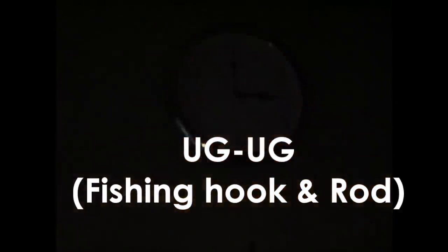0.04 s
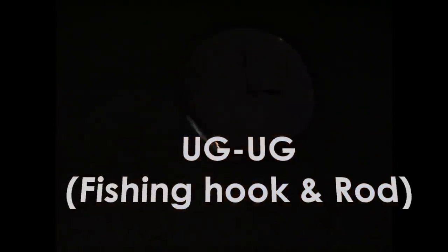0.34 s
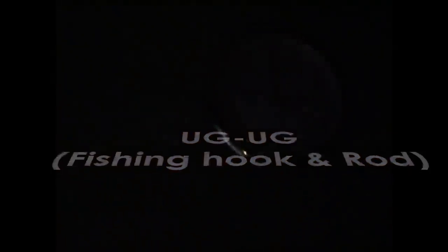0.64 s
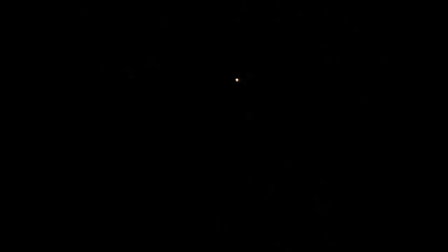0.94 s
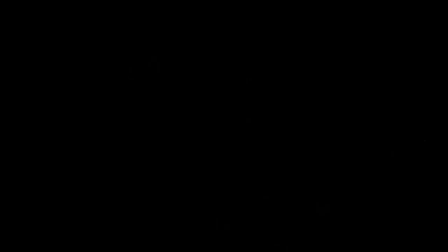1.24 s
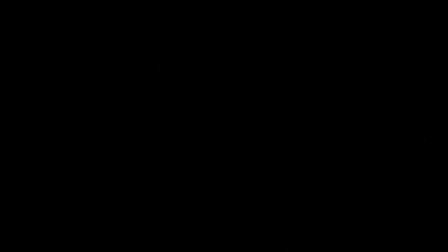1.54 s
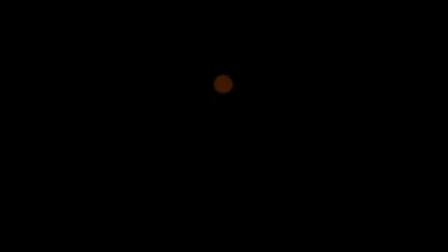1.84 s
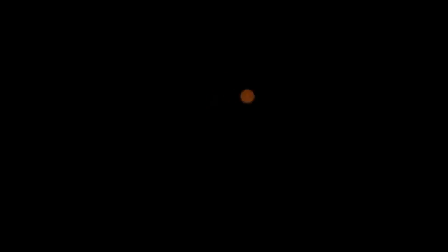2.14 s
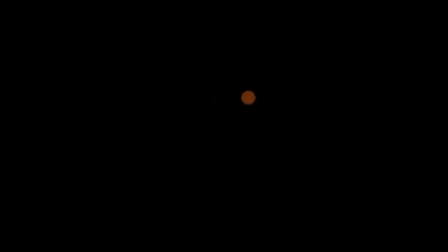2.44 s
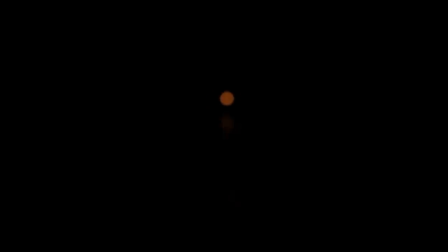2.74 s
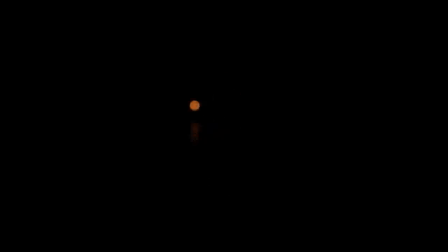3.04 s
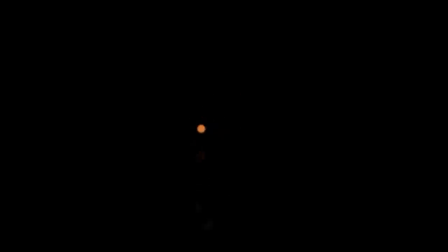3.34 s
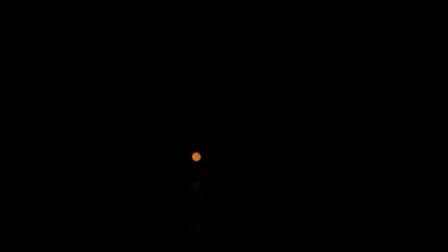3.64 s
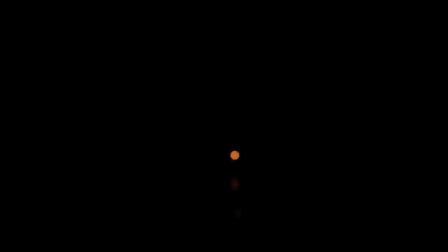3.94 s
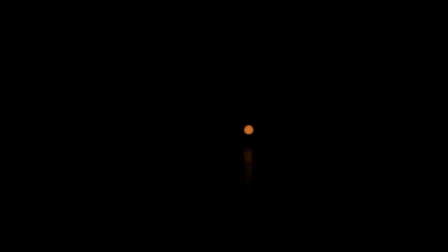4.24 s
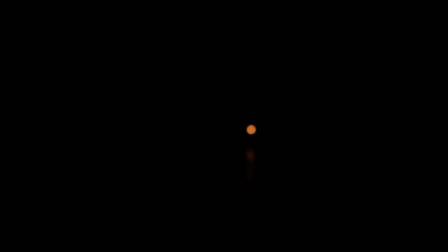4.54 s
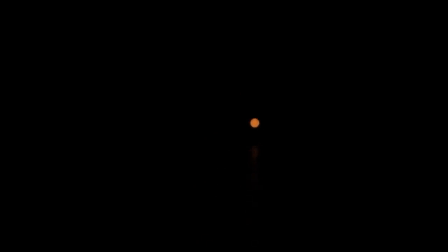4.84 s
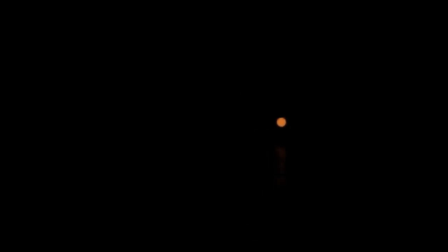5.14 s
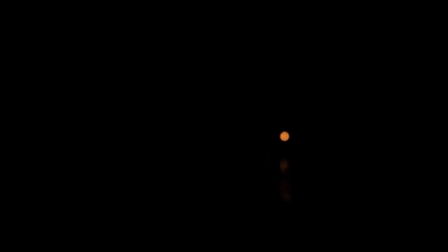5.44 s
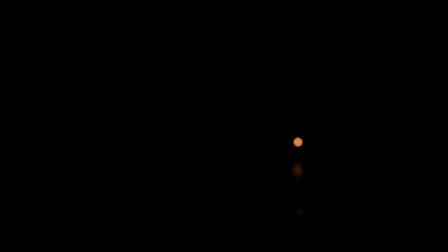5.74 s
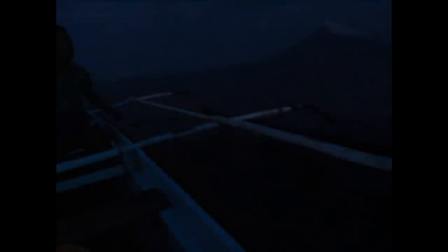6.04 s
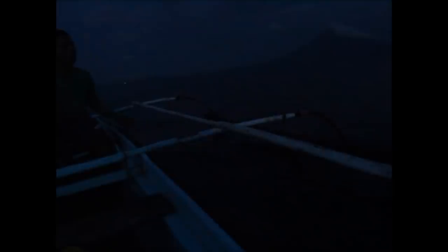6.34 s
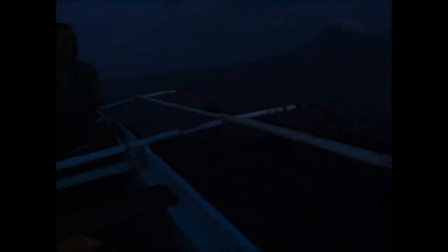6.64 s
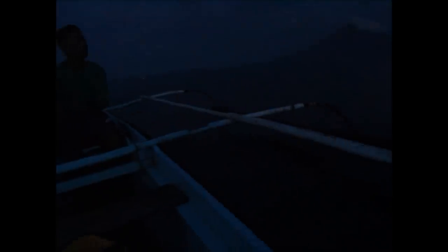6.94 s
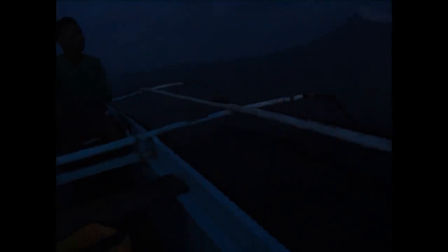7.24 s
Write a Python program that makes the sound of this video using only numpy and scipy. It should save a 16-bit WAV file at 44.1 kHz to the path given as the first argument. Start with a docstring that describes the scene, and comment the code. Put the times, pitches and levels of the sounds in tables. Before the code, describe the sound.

Heard from aboard a small boat at sea at night, a one-cylinder engine putters rapidly and steadily, with metallic clatter, small dry ticks and a low rumble of water. It is preceded by a short, faint moment of hum and high insect chirps. For the last second and a half it jumps abruptly to a louder, slightly slower pounding. Each change is a sharp cut with a click, and the bass sits mostly on the right.

```python
"""On the water at night, in three moments: a quiet hum with shrill insect chirps, a small outrigger
boat under way, then the same boat louder. Its single-cylinder engine is a periodic impulse source,
firing about 12-14 times a second: a combustion knock, then a hiss of gas and a thump that glides
up in pitch. The hull reflects each thump and resonates with it, loose metal clacks and water surges.
The right microphone takes most of the bass."""
import sys
import numpy as np
from scipy import signal
from scipy.fft import rfft, irfft
from scipy.io import wavfile

SR = 44100
rng = np.random.default_rng(int(sys.argv[2]) if len(sys.argv) > 2 else 0)


def int16_out(signal):
    """Quantize to a 16-bit WAV file."""
    q = np.round(np.clip(np.atleast_2d(signal).T, -1, 1) * 32767)
    wavfile.write(sys.argv[1], SR, q.astype(np.int16))


N = 326781
TIME, HZ = np.arange(N) / SR, np.fft.rfftfreq(N, 1 / SR)
# the three moments: (start [s], end [s], fade-out [s])
NIGHT_SPAN, CRUISE_SPAN, LOUD_SPAN = (0, .865, .004), (.974, 5.785, .025), (5.879, 7.42, .001)


def gain_of(db):
    """Amplitude grows tenfold every 20 dB."""
    return 10 ** (np.asarray(db) / 20)


def read(points, hz):
    """Linear interpolation on a log-frequency axis."""
    f, value = np.transpose(points)
    return np.interp(np.log(hz + 1), np.log(f + 1), value)


def add(mix, s, sound):
    """Superposition: a sound joins the mix at s seconds."""
    part = mix[max(round(s * SR), 0):][:len(sound)]
    part += sound[:len(part)]


def noise(spectrum, coherence=0):
    """Spectral shaping: two channels of coloured, partly coherent noise of rms 1."""
    left, right = rfft(rng.standard_normal((2, N)))
    left = coherence * right + np.sqrt(1 - coherence ** 2) * left
    x = irfft(np.array([left, right]) * gain_of(read(spectrum, HZ)), N)
    return x / x.std()


def bursts(times, levels_db, rise, hold, t60):
    """An envelope of linear rises, holds and exponential decays, all in seconds."""
    t, envelope = np.arange(SR // 8) / SR, np.zeros(N)
    shape = np.minimum(t / rise, 1) * gain_of(-60 * np.maximum(t - rise - hold, 0) / t60)
    for s, db in zip(times, levels_db):
        add(envelope, s, gain_of(db) * shape)
    return envelope


def during(span):
    """A time window that opens at once and fades at its end."""
    start, end, fade = span
    return (TIME >= start) * np.clip((end - TIME) / fade, 0, 1)


# left microphone against the right: (frequency [Hz], phase lead [rad])
LEFT_LEAD = [(60, 2.15), (200, 1.6), (400, 0.9), (1000, 1.36), (3000, 1.37), (10000, 1.83)]
def microphones(x, left_db):
    """Level and phase differences: the left port is weaker in the bass and ahead in phase."""
    response = gain_of(read(left_db, HZ)) * np.exp(1j * read(LEFT_LEAD, HZ))
    return np.array([irfft(rfft(x[0]) * response, N), x[1]])


# partials of the hum: (frequency [Hz], rms level [dB])
HUM_PARTIALS = [(232.5, -56.5), (465, -68.5), (549, -68.5), (624, -69.5)]
def hum():
    """Steady pure tones superpose in random phase."""
    return sum(gain_of(db) * np.sqrt(2) * np.sin(2 * np.pi * (hz * TIME + rng.random()))
               for hz, db in HUM_PARTIALS)


# chirps: (centre time [s], Gaussian width [s], frequency [Hz], bandwidth [Hz], relative level [dB])
INSECT_CHIRPS = [(0.127, 0.017, 6560, 330, -56), (0.176, 0.023, 6600, 400, -47.5),
                 (0.193, 0.031, 5400, 400, -54), (0.268, 0.019, 6530, 400, -59),
                 (0.433, 0.019, 6700, 260, -52), (0.489, 0.033, 6630, 520, -48.5),
                 (0.737, 0.025, 6520, 280, -50.5), (0.794, 0.039, 6750, 520, -55.5),
                 (0.8, 0.02, 5740, 600, -54.5)]
# rasp under the chirps: (frequency [Hz], relative level [dB])
RASP_SPECTRUM = [(200, -7), (900, -1), (3000, 0.5), (5000, 1), (8000, -6), (11000, -25), (15000, -30)]
def chirps():
    """Modulation by narrow-band noise widens each insect's tone to a fuzzy whistle over a faint rasp."""
    whistles, rasp_level = np.zeros((2, N)), np.zeros(N)
    for s, length, hz, width, db in INSECT_CHIRPS:
        t = np.arange(-3 * length, 3 * length, 1 / SR)
        swell = gain_of(db) * np.exp(-(t / length) ** 2 / 2)
        pole = np.exp(-np.pi * width / SR)
        add(rasp_level, s + t[0], swell)
        for channel in whistles:
            white = [1, 1j] @ rng.standard_normal((2, len(t)))
            fuzz = signal.lfilter([1], [1, -2 * pole, pole * pole], white)
            wing = (fuzz * np.exp(2j * np.pi * hz * t)).real
            add(channel, s + t[0], swell * wing / wing.std())
    return whistles + gain_of(-8.5) * rasp_level * noise(RASP_SPECTRUM)


def tick():
    """A damped transient: one small tick of noise, strongest near 700 Hz."""
    spectrum = [(200, -28), (700, 12), (1300, 7), (3200, -2), (5000, -16), (9000, -22), (15000, -36)]
    return noise(spectrum) * bursts([.152], [-41], rise=.00043, hold=.001, t60=.042)


# night air: (frequency [Hz], relative level [dB])
AIR_SPECTRUM = [(18, -52), (30, -14), (177, -15.5), (230, -12), (284, -9.5), (369, -13), (546, -10.5),
                (1640, -18.5), (2760, -20.5), (5740, -26), (6720, -19), (8280, -30.5), (15500, -41)]
# left microphone against the right: (frequency [Hz], gain [dB])
NIGHT_LEFT = [(60, -10), (110, 1), (200, -15), (380, -7), (700, -8.5), (1290, -6), (2380, -3.5), (4400, -4),
              (8120, -5), (15000, 2)]
def night():
    """A broadband noise floor lies under the hum, three groups of chirps and the tick."""
    air = gain_of(-54.5) * noise(AIR_SPECTRUM)
    return during(NIGHT_SPAN) * microphones(air + hum() + tick() + gain_of(-1) * chirps(), NIGHT_LEFT)


# a click opens each engine moment: (time [s], level [dB])
CUT_CLICKS = [(0.974, -33.5), (5.88, -22)]
def clicks():
    """A signal discontinuity is broadband: a sharp edit click where each engine moment cuts in."""
    t, spikes = np.arange(SR // 100) / SR, np.zeros(N)
    for s, db in CUT_CLICKS:
        add(spikes, s, gain_of(db) * np.exp(-t / .0005))
    return gain_of([[-4], [0]]) * spikes


# charges that burn clearly harder or softer: (time [s], change of gas hiss [dB])
ODD_FIRINGS = [(1.13, 4), (1.34, 2.5), (1.63, 2), (2.63, 6.5), (3.28, 2), (3.49, 3), (5.14, 3.5),
               (5.21, -7.5), (6.19, 2), (6.28, -2.5), (6.54, 2), (6.79, -4.5), (6.87, 1.5), (7.03, 2),
               (7.28, -4), (7.36, -5.5)]
def firings(first_s, speed, effort, span, gas_db, gas_per_effort, jitter_s, thump_spread_db,
            gas_spread_db):
    """Cycle-to-cycle variation: thump and hiss follow the effort, but no two charges burn alike."""
    t = np.arange(first_s, span[1] - span[2], 1 / SR)
    cycles = np.cumsum(np.interp(t, *np.transpose(speed))) / SR
    s = np.interp(np.arange(np.ceil(cycles[-1])), cycles, t)  # the exhaust opens once a cycle
    effort_db = np.interp(s, *np.transpose(effort))
    late, push, burn = np.sqrt(3) * rng.uniform(-1, 1, (len(s), 3)).T
    change_db = gas_spread_db * burn
    for at, db in ODD_FIRINGS:
        if span[0] < at < span[1]:
            change_db[np.argmin(abs(s - at))] = db
    thump_db = effort_db + thump_spread_db * push + .11 * change_db
    hiss_db = gas_db + gas_per_effort * (effort_db - effort_db.mean()) + change_db
    return s + jitter_s * late, thump_db, hiss_db


# likeness of the two channels: (frequency [Hz], coherence [0-1])
COHERENCE = [(100, 0.94), (400, .9), (700, 0.77), (2500, 0.83), (5000, 0.67), (14000, 0.44)]
def boat_noise(spectrum):
    """Partial coherence: the boat's noise is less alike at the two microphones in the treble."""
    return noise(spectrum, read(COHERENCE, HZ))


# combustion knock: (frequency [Hz], relative level [dB])
KNOCK_SPECTRUM = [(300, 7.5), (700, -9), (1300, 3.5), (2300, -11.5), (3500, -19.5), (6000, -34.5),
                  (10000, -33), (15000, -54)]
def knocks(times, levels_db, spread_db, **envelope):
    """Impulsive excitation: each burning charge gives a noise burst of uneven strength."""
    carrier = boat_noise(KNOCK_SPECTRUM)
    return carrier * bursts(times, levels_db + spread_db * rng.standard_normal(len(times)), **envelope)


def churn(times, levels_db, spectrum):
    """Amplitude modulation: the engine's continuous clatter follows the strength of its firings."""
    return gain_of(np.interp(TIME, times, levels_db)) * boat_noise(spectrum)


def ringing(x, modes):
    """Forced resonance: the direct sound plus a decaying ring at each mode."""
    ring = sum(gain_of(db) * 1j * HZ * width / (hz ** 2 - HZ ** 2 + 1j * HZ * width)
               for hz, width, db in modes)
    return irfft(rfft(x) * (1 + ring), N)


# engine block: (frequency [Hz], bandwidth [Hz], gain [dB])
BLOCK_MODES = [(1070, 41, -10.5), (1192, 47, -3), (1507, 190, -3), (1910, 68, -16), (2267, 99, -1),
               (2906, 77, -3.5)]
def engine_block(x):
    """The block's natural modes colour the clatter."""
    return ringing(x, BLOCK_MODES)


# surges against the hull: (crest time [s], Gaussian width [s], relative level [dB])
WATER_SURGES = [(1.35, 0.19, -45), (2.2, 0.13, -45), (2.98, .11, -49), (3.9, 0.11, -63), (4.62, 0.086, -55),
                (5.35, .2, -63.5), (6.07, 0.11, -51), (6.75, .15, -49), (7.4, .16, -46.5)]
# their rumble: (frequency [Hz], relative level [dB])
WATER_SPECTRUM = [(20, -33), (38, -26.5), (50, 2), (59, 5), (78, -15.5), (200, -67)]
def water():
    """Slow modulation of low noise: water swells and ebbs against the hull."""
    calm = gain_of(-65.5)
    surges = sum(gain_of(db) * np.exp(-((TIME - s) / width) ** 2 / 2) for s, width, db in WATER_SURGES)
    return (calm + surges) * boat_noise(WATER_SPECTRUM)


def scattered(x, wet_db, t60, count=40):
    """Scattering: planks and outriggers return a spray of echoes, different at each microphone."""
    delays = rng.uniform(.0005, .025, (2, count))
    taps = np.zeros((2, SR // 16))
    heights = rng.choice([-1, 1], delays.shape) * gain_of(-60 * delays / t60)
    np.put_along_axis(taps, (delays * SR).astype(int), heights, 1)
    taps /= np.linalg.norm(taps, axis=1, keepdims=True)
    return x + gain_of(wet_db) * signal.oaconvolve(x, taps, axes=1)[:, :N]


# reflections of the thump: (delay [s], signed gain [ratio])
HULL_ECHOES = [(.00383, -0.55), (0.0143, 0.32)]
def thumps(times, levels_db, glide, pitch_spread, uneven_db, overtone_db, shut_t60):
    """Cavity resonance: blow-down rings cylinder and pipe, rising as the piston shrinks the volume."""
    at, hz, db = np.transpose(glide)
    t, pipe = np.arange(SR // 20) / SR, np.zeros(N)
    chances = rng.standard_normal((len(times), 2, len(at)))
    for s, level_db, (shift, luck) in zip(times, levels_db, chances):
        angle = 2 * np.pi * np.cumsum(np.interp(t, at, hz * (1 + pitch_spread * shift))) / SR
        shape_db = np.interp(t, at, db + uneven_db * luck)
        shape_db -= 60 * np.maximum(t - at[-1], 0) / shut_t60  # the valve shuts
        overtones = np.sin(2 * angle) + np.sin(3 * angle) / 2  # strong waves steepen
        add(pipe, s, gain_of(level_db + shape_db) * (np.sin(angle) + gain_of(overtone_db) * overtones))
    paths = 1 + sum(gain * np.exp(-2j * np.pi * HZ * delay) for delay, gain in HULL_ECHOES)
    return irfft(rfft(pipe) * paths, N)


# loose metal struck at each firing: (frequency [Hz], relative level [dB], t60 [s])
CLACK_MODES = [(1954.4, -7.5, 0.066), (2260, -11, 0.035), (2850, -3, 0.05), (3770, -12, .05),
               (5400, -15.5, 0.03)]
def clacks(times, levels_db, uneven_db, detune):
    """Free vibration: loose metal is struck differently each time, so modes vary in level and pitch."""
    t, metal = np.arange(SR // 16) / SR, np.zeros(N)
    chances = np.clip(rng.standard_normal((len(times), len(CLACK_MODES), 2)), -2, 2)
    for s, level_db, chance in zip(times, levels_db, chances):
        for (hz, db, t60), (luck, shift) in zip(CLACK_MODES, chance):
            envelope = gain_of(level_db + db + uneven_db * luck - 60 * t / t60) * np.minimum(t / .002, 1)
            add(metal, s, envelope * np.sin(2 * np.pi * hz * (1 + detune * shift) * t))
    return metal


# engine speed: (time [s], firing rate [Hz])
CRUISE_SPEED = [(1.01, 13.962), (2.12, 13.867), (2.46, 14.106), (2.71, 13.752), (3.08, 14.086),
                (4.0, 13.896), (4.41, 14.053), (5.75, 13.631)]
# engine effort: (time [s], relative thump level [dB])
CRUISE_EFFORT = [(1.0, -18), (1.95, -18.5), (2.7, -20.5), (3.5, -20), (4.15, -21), (5.7, -20.5)]
# exhaust note: (time after opening [s], frequency [Hz], relative level [dB])
CRUISE_GLIDE = [(0.0, 202.5, -11.5), (0.0053, 165.2, -0.5), (0.0108, 262.2, -4.5), (0.014, 253.3, 0.5),
                (0.0192, 380, -4), (0.0213, 496, -20)]
# spectra of gas hiss and clatter: (frequency [Hz], relative level [dB])
CRUISE_GAS = [(60, -27.5), (130, 14.5), (400, 13.5), (560, 7), (900, 4), (1500, 0), (2800, 0), (3400, -2.5),
              (4500, -9), (7500, -14), (11000, -22.5), (15000, -34.5)]
CRUISE_CHURN = [(25, -39), (45, -20.5), (120, 2), (330, -3), (480, -7), (560, -7), (1000, -19), (1700, -25),
                (2900, -28), (4000, -35), (7000, -46), (10500, -52), (15000, -69.5)]
# modes of the hull, and of pipe and cowling: (frequency [Hz], bandwidth [Hz], gain [dB])
CRUISE_HULL = [(279.2, 12, -2), (345.6, 38, -4), (416.3, 7.9, -2), (477, 14, 7.5), (576, 8.8, 10),
               (683, 11, 8.5), (740.5, 6.8, 19.5), (806, 15, 9)]
CRUISE_METAL = [(660, 43, -1.5), (1144, 42, 8.5), (1303, 70, 7), (1523, 77, 6.5), (1738, 30, 0),
                (1957, 60, 7.5), (2220, 85, 4), (2795, 89, 1), (3836, 48, 7), (4140, 55, 3.5),
                (4180, 32, 5.5), (4780, 91, 6), (5290, 70, 2), (5660, 66, 4.5), (6460, 34, 4),
                (6980, 49, -1.5)]
# left microphone against the right: (frequency [Hz], gain [dB])
CRUISE_LEFT = [(60, -15), (110, -19), (200, -22), (380, -16.5), (700, -16), (1290, -12), (2380, -13),
               (4400, -10), (8120, -5.5), (15000, -8)]
def cruising():
    """Periodic forcing: fourteen soft beats a second drive hull, pipe and block."""
    s, thump_db, gas_db = firings(
        first_s=.9827, speed=CRUISE_SPEED, effort=CRUISE_EFFORT, span=CRUISE_SPAN, gas_db=-44,
        gas_per_effort=1.47, jitter_s=.0004, thump_spread_db=.02, gas_spread_db=1.5)
    thump = thumps(s, thump_db + 7.5, CRUISE_GLIDE,
                   pitch_spread=.012, uneven_db=.16, overtone_db=-29, shut_t60=.045)
    gas = boat_noise(CRUISE_GAS) * bursts(s - .0016, gas_db + 3.3, rise=.0021, hold=.004, t60=.071)
    knock = knocks(s - .015, thump_db - 27, spread_db=2, rise=.0057, hold=.0073, t60=.11)
    block = engine_block(knock + churn(s, thump_db - 17.5, CRUISE_CHURN))
    pipe = ringing(scattered(gas, wet_db=-8, t60=.04), CRUISE_METAL)
    clack = clacks(s, gas_db + 1.5, uneven_db=5.5, detune=.015)
    boat = ringing(thump, CRUISE_HULL) + pipe + block + clack + gain_of(5.5) * water()
    return during(CRUISE_SPAN) * microphones(boat, CRUISE_LEFT)


# ticks of loose gear: (time [s], level [dB])
GEAR_TICKS = [(1.078, -50), (1.109, -48), (1.118, -49), (1.401, -50), (1.961, -48.5), (3.191, -43.5),
              (4.463, -51.5), (6.314, -46.5), (6.402, -52), (6.658, -55), (6.984, -54)]
# their spectrum: (frequency [Hz], relative level [dB])
GEAR_SPECTRUM = [(500, -18), (2000, 2), (4000, 4), (6500, -2), (10000, -10.5), (15000, -21)]
def rattles():
    """Heavily damped impacts: gear shaken in the boat gives small dry ticks."""
    s, db = np.transpose(GEAR_TICKS)
    ticks = boat_noise(GEAR_SPECTRUM) * bursts(s, db, rise=.0005, hold=.00082, t60=.018)
    return microphones(ticks, CRUISE_LEFT)


# engine speed: (time [s], firing rate [Hz])
LOUD_SPEED = [(5.86, 11.635), (6.08, 12.288), (6.18, 11.35), (6.4, 11.703), (6.87, 12.226), (7.1, 11.995),
              (7.33, 12.315)]
# engine effort: (time [s], relative thump level [dB])
LOUD_EFFORT = [(5.95, -13), (6.4, -10), (6.95, -9.3), (7.4, -10)]
# exhaust note: (time after opening [s], frequency [Hz], relative level [dB])
LOUD_GLIDE = [(0.0, 250, -4.5), (0.0025, 117, -19), (0.0052, 180, -5), (0.0155, 249.7, 0.0),
              (0.0208, 382, -4), (0.0249, 382, -17.5)]
# spectra of gas hiss and clatter: (frequency [Hz], relative level [dB])
LOUD_GAS = [(60, -16), (150, 8.5), (400, 13.5), (560, 2.5), (1000, 0), (2500, -6), (3400, -10), (5000, -16),
            (8000, -17.5), (11000, -20.5), (15000, -32)]
LOUD_CHURN = [(25, -30), (45, -11), (120, -11), (370, 6.5), (470, -5.5), (560, -10), (1000, -14),
              (1700, -22.5), (3100, -27.5), (4200, -36.5), (7000, -43.5), (10500, -49), (15000, -60)]
# modes of the hull, and of pipe and cowling: (frequency [Hz], bandwidth [Hz], gain [dB])
LOUD_HULL = [(261, 13, -1.5), (335.4, 26, -14), (430, 10.3, -1.5)]
LOUD_METAL = [(1036, 110, 3.5), (1498, 97, 2.4), (1685, 42, 2.7), (1855, 25, 5.3), (2325, 143, 9),
              (2800, 130, 7.6), (3210, 97, 2.3), (3960, 70, 2.6), (4480, 44, 2.6), (4920, 96, 4.6),
              (5130, 88, 2.5), (6540, 29, 1.6), (6900, 53, 2.1)]
# left microphone against the right: (frequency [Hz], gain [dB])
LOUD_LEFT = [(60, -11), (110, -19), (200, -18), (380, -18.5), (700, -15), (1290, -11), (2380, -8.5),
             (4400, -4), (8120, -1), (15000, -7)]
def labouring():
    """Stronger forcing: twelve hard beats a second, each knocking just before the exhaust opens."""
    s, thump_db, gas_db = firings(
        first_s=5.855, speed=LOUD_SPEED, effort=LOUD_EFFORT, span=LOUD_SPAN, gas_db=-35,
        gas_per_effort=.56, jitter_s=.00027, thump_spread_db=.03, gas_spread_db=.7)
    thump = thumps(s, thump_db + 6, LOUD_GLIDE,
                   pitch_spread=.0021, uneven_db=.1, overtone_db=-34, shut_t60=.044)
    blast = bursts(s - .0014, gas_db, rise=.0019, hold=.0058, t60=.032)
    boat_echo = bursts(s + .0058, gas_db - 18, rise=.0054, hold=.0021, t60=.097)
    gas = gain_of(5.5) * boat_noise(LOUD_GAS) * (blast + boat_echo)
    knock = knocks(s - .0152, thump_db - 22.5, spread_db=1.6, rise=.0018, hold=.0036, t60=.13)
    block = engine_block(churn(s, thump_db - 22.5, LOUD_CHURN))
    pipe = ringing(scattered(gas + knock, wet_db=-9.5, t60=.035), LOUD_METAL)
    clack = clacks(s, gas_db - 1.5, uneven_db=4.5, detune=.022)
    boat = ringing(thump, LOUD_HULL) + pipe + block + clack + gain_of(7) * water()
    return during(LOUD_SPAN) * microphones(boat, LOUD_LEFT)


def scene():
    """Superposition of the three moments, one after another."""
    return night() + clicks() + cruising() + labouring() + rattles()


def record(dry):
    """Band limiting: a linear-phase low-pass filter cuts off at 15.8 kHz."""
    lowpass = signal.firwin(511, 15800, window=("kaiser", 9), fs=SR)
    return signal.oaconvolve(dry, lowpass[None], "same")


dry = scene()
out = record(dry)
int16_out(out)
```